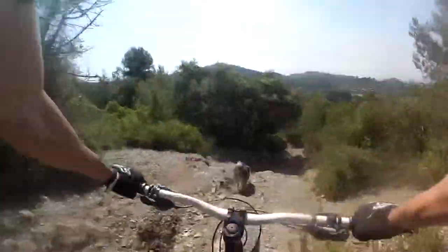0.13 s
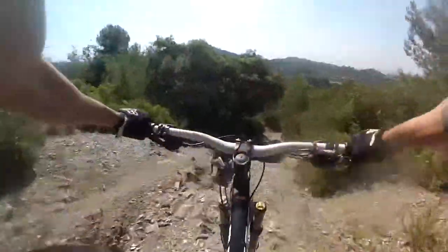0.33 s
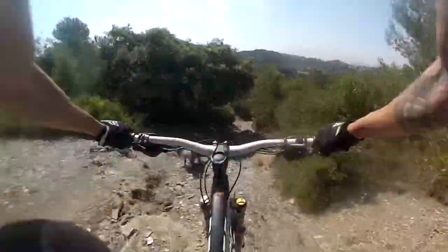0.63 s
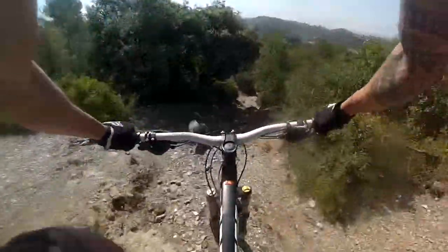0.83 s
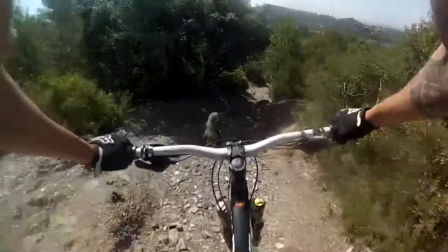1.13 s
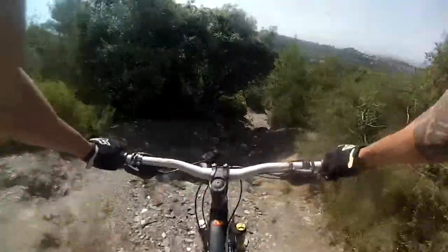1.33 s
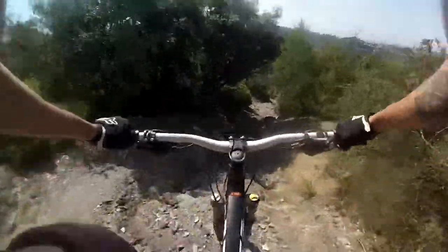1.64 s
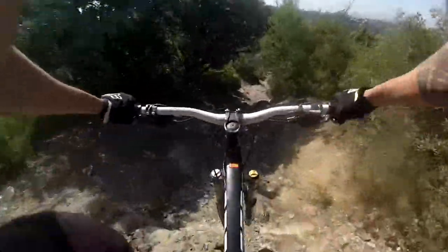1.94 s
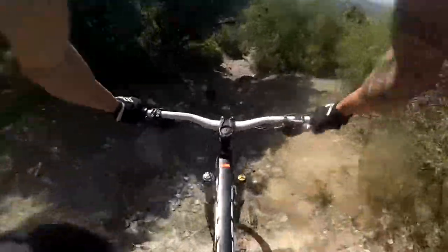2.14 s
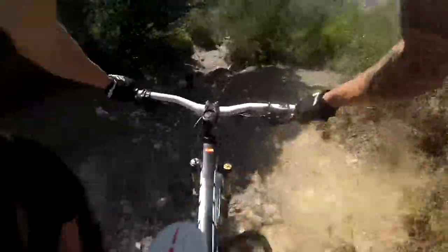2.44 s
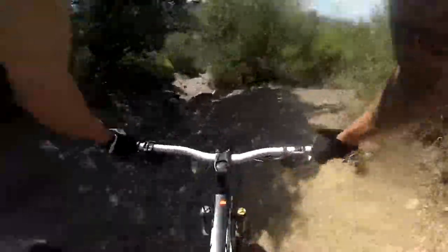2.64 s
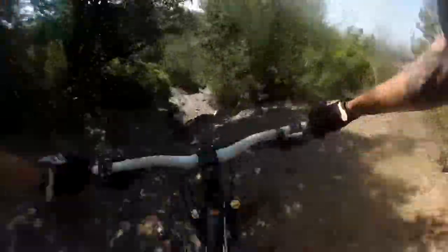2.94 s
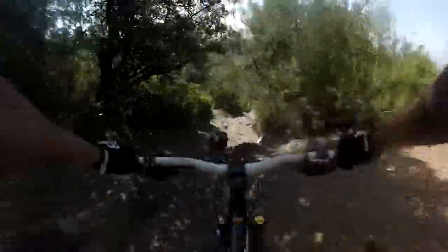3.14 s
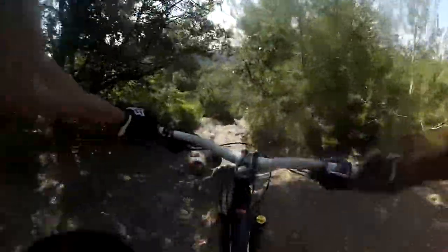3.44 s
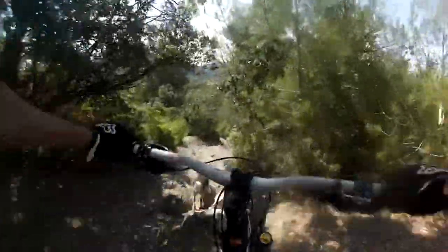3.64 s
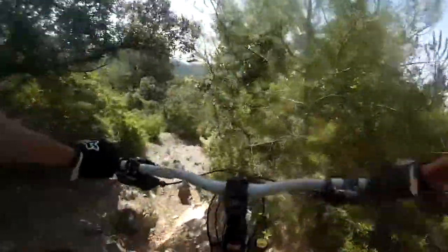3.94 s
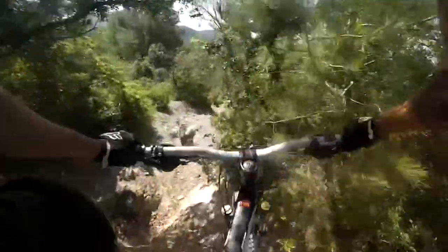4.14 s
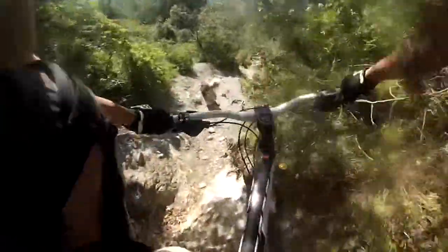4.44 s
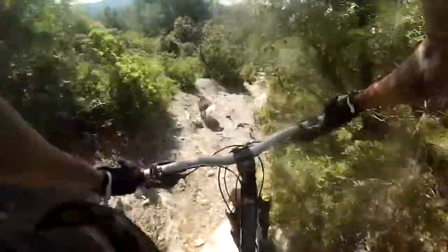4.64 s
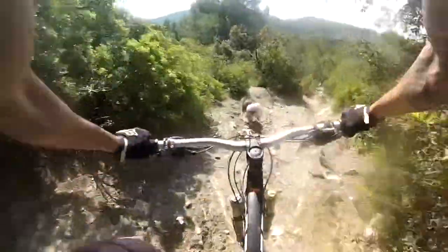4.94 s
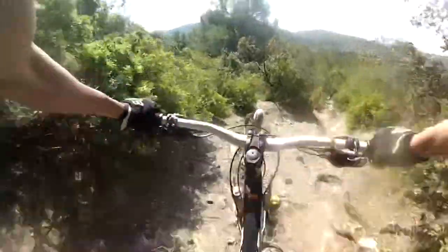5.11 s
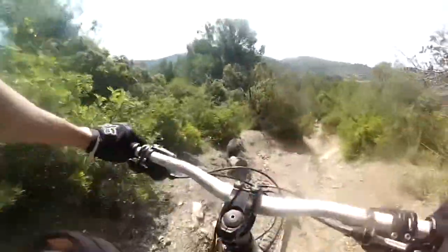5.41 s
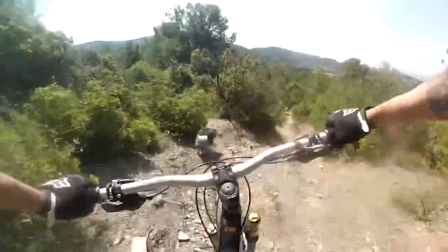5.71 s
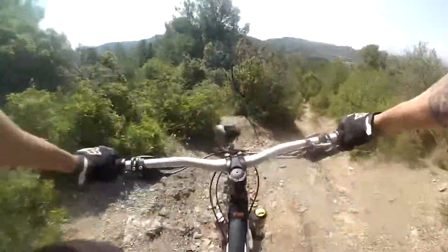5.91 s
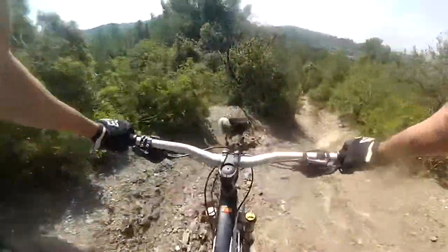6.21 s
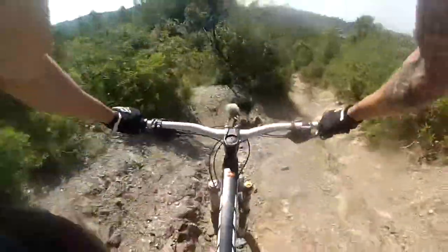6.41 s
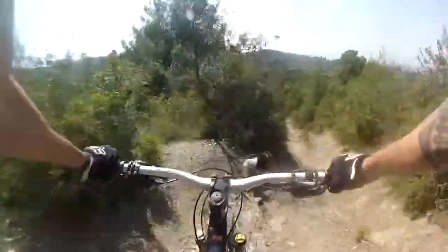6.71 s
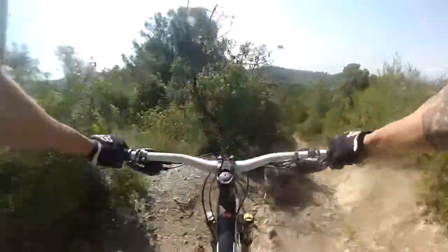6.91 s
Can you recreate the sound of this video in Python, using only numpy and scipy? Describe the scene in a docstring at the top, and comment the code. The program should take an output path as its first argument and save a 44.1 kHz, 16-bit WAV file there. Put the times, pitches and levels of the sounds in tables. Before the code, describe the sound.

A mountain bike rattles down a dry, stony trail, tyres crunching over loose stones while sharp hollow knocks hit the camera case and wind buffets.

```python
"""A mountain bike rolls 7 s down a dry, stony trail, heard from a cased camera on the rider's chest.
From 0.08 s jolts knock mount and case (short mode rings; hard ones add faint metal); the first brings a thump and
grating. Throughout, tyres thrum, grind and crunch (shaped noise and grains), stones tick, the chain jingles, gusts buffet.
At 2.96 s comes the strongest thump, at 3.1 s the strongest grating, at 3.7 s a very hard knock.
From 4.4 to 5.2 s dust hisses under sliding tyres; near 6.7 s a last thump, at 6.9 s a last bright, hard knock."""
import sys
import numpy as np
from scipy import signal
from scipy.fft import rfft, irfft, next_fast_len
from scipy.io import wavfile

SR = 44100
rng = np.random.default_rng(int(sys.argv[2]) if len(sys.argv) > 2 else 0)


def output_pcm(signal):
    """Save a mono or channel-first signal as 16-bit PCM at the path in sys.argv[1].

    Samples are clipped to [-1, 1] before scaling.
    """
    pcm = np.clip(np.atleast_2d(signal).T, -1, 1) * 32767
    wavfile.write(sys.argv[1], SR, np.round(pcm).astype(np.int16))


N = 311346
TIME_S = np.arange(N) / SR

# knocks on the case: t/s, strength/dB, hardness/dB (thud down, clack up by this), snap re strength/dB
KNOCKS = [(.0772, -20.5, 5, -6), (.1028, -38, -6, -3), (.1849, -22.5, -4.5, -9), (.2332, -18, 5.5, -4.5),
          (.281, -26.5, 4, -7), (.3965, -18, -1.5, -7.5), (.466, -33, -2.5, -10),
          (.5266, -38.5, -9.5, -3.5), (.6555, -15, -3.5, -5.5), (.68, -37, -2, -2),
          (.7099, -24, -4.5, -3.5), (.838, -31, -3, -6), (.9, -24.5, 3, -14.5), (.9315, -25, -3.5, -8.5),
          (.9954, -35, -2.5, -10), (1.071, -23, 2, -10), (1.081, -28.5, -1.5, -5.5), (1.146, -39, 3, -10),
          (1.1849, -35, 0, -10), (1.2093, -27, 4.5, 1), (1.2954, -31, 3.5, -3), (1.495, -26, 2, -5.5),
          (1.631, -42, 4, -1.5), (1.7514, -20.5, 8.5, 1), (1.8826, -48, -18.5, -25),
          (1.9897, -28, -3, -9.5), (2.1091, -35.5, -4, -10.5), (2.1459, -34.5, -3.5, -9),
          (2.2842, -19, 3.5, -9.5), (2.3803, -31.5, -1.5, -19), (2.5286, -30.5, -2, -30),
          (2.5907, -38, 4, -16), (2.6527, -22, 5, -2.5), (2.6926, -23.5, -2.5, -8.5),
          (2.7309, -22.5, 1, -8), (2.757, -23, 4.5, -14), (2.8398, -25, -0.5, -5),
          (2.8563, -31.5, -3.5, -13), (2.9808, -27.5, 2, -10), (2.9882, -38, 7, -20),
          (3.052, -27.5, 2.5, -19), (3.1015, -34, 10, -6), (3.2047, -37, 0, -11), (3.227, -40, 2, -25),
          (3.2703, -18.5, 5, -10), (3.2841, -25, 4.5, -8), (3.3108, -32.5, -2, -24), (3.3263, -34, -1, -27),
          (3.3408, -33, 1.5, -32), (3.6882, -35, -4, -5), (3.692, -15, 5, -5), (3.7175, -29.5, 9.5, 10.5),
          (3.7513, -31.5, -2, -25), (3.7559, -25.5, -1, -5), (3.993, -26, 1.5, -9.5),
          (4.1364, -24, -2.5, -6.5), (4.2794, -23, -3.5, -6), (4.3327, -39, -3, -7),
          (4.4108, -35.5, -2.5, -7.5), (4.4317, -45.5, 2, 7), (4.691, -29.5, -0.5, -12),
          (4.929, -30.5, 3, -7), (5.064, -19.5, -3, -5.5), (5.4089, -20.5, 6, -12.5),
          (5.4699, -36, -2, -7.5), (5.5394, -22.5, 8, 0.5), (5.7184, -37.5, 3.5, -16),
          (5.8038, -22, 6.5, -10), (5.9375, -26.5, -3.5, -6), (6.187, -38.5, -4, -4.5),
          (6.4805, -43.5, -3.5, -7), (6.7072, -36.5, -10, -5.5), (6.7536, -27, 0, -12),
          (6.778, -35, -5, -22), (6.7906, -42, 7, 3), (6.8311, -33, 8.5, -6), (6.931, -17, 10.5, -6.5),
          (7.0212, -34, 1.5, -17)]
# edges of the case's mode families thud, tock, clack, snap: f/Hz
FAMILY_EDGES_HZ = [510, 850, 1400, 2400, 7000]
# case modes: f/Hz, level within family/dB, t60/s; a mode above the last edge stays silent
CASE_MODES = [(631, -12, 0.097), (704, 14.5, 0.028), (783, -8, 0.11), (1023, 29, 0.017), (1113, 6, 0.045),
              (1290, -19, .01), (1494, -3.5, 0.047), (1692, 26, 0.012), (1980, 10, 0.015),
              (2680, 3.5, 0.028), (2783, 5.5, 0.017), (3172, 13, 0.007), (3327, 3, 0.02),
              (4530, -27.5, 0.042), (5060, -8, 0.022), (7060, -8, 0.033)]
# long metal ring of the bike: f/Hz, level/dB, t60/s
METAL_MODES = [(1835, -32, .3), (2013, -30.5, .27)]
# bumps through the mount as bursts of grating: t/s, level/dB, t60/s
CHAFES = [(0.093, -30, 0.19), (1.526, -36, 0.065), (2.592, -37, 0.082), (2.66, -48, 0.088),
          (2.966, -31, 0.15), (3.102, -21, 0.16), (3.293, -33.5, 0.15), (4.675, -36, 0.18),
          (5.136, -37, 0.32), (6.16, -32.5, 0.084), (6.703, -35, 0.16), (6.755, -46, 0.12)]
# grating spectrum: f/Hz, relative level/dB
CHAFE_SPECTRUM = [(400, -4), (700, 13), (1050, 16), (1400, -15), (1750, 10.5), (2200, -3), (3200, 1.5),
                  (4200, -11), (8000, -56)]
# tyre load on the ground: t/s, level/dB
LOAD = [(0, 0.5), (.7, -3.5), (1.42, -3.5), (1.62, -2), (1.86, -6), (2.25, -3), (2.7, 3), (3.15, 1.5),
        (3.55, -2), (3.84, -4), (4.15, -4), (4.5, -3.5), (4.76, 1), (5.12, -2.5), (5.4, -3), (5.82, -6.5),
        (6.15, -4.5), (6.58, -4.5), (6.85, 2), (7.06, -1)]
# rough patches of trail: start t/s, length/s, extra thrum/dB, extra stone rattle/dB
PATCHES = [(0.085, 0.063, 9, 11), (0.51, 0.048, 11, 11.5), (0.774, 0.054, 13, 11.5), (0.985, 0.029, 16, 6),
           (1.136, 0.11, 5.5, 11.5), (1.515, 0.14, 6, 14), (1.675, 0.12, 10, 16), (1.924, 0.16, 7, 6.5),
           (2.118, 0.1, 11, 5), (2.364, 0.18, 9, 8), (2.587, 0.162, 8, 12), (2.957, 0.26, 2.5, 6),
           (3.442, 0.07, 7.5, 9.5), (3.9, 0.055, 4, 14), (4.11, 0.16, 0, 7.5), (4.238, 0.12, 9.5, 7.5),
           (4.598, 0.13, 5.5, 9.5), (4.915, 0.13, 8.5, 4), (5.141, 0.125, 14, 6.5), (5.98, 0.15, 9.5, 6),
           (6.174, 0.15, 7, 1), (6.695, 0.13, 10, 10)]
# tyre thrum spectrum: f/Hz, relative level/dB
THRUM_SPECTRUM = [(60, -16.5), (120, -0.5), (210, 1.5), (310, -1.5), (430, -2), (600, -23), (1200, -55)]
# wheels drop into hollows: t/s, level/dB, pitch f/Hz, t60/s
THUMPS = [(.095, -28, 292, 0.06), (0.227, -33.5, 170, 0.059), (2.962, -20.5, 205, .09),
          (6.701, -22, 275, 0.087)]
# frame-borne rattle spectrum: f/Hz, relative level/dB
GRIND_SPECTRUM = [(300, -15), (460, 1.5), (600, 1.5), (750, 1), (1050, 4.5), (1200, -5.5), (1420, -24.5),
                  (1750, -8.5), (2200, -15.5), (2700, -17.5), (3600, -88)]
# crunching grit spectrum: f/Hz, relative level/dB
GRAVEL_SPECTRUM = [(1200, 3.5), (2200, -8.5), (3000, 3.5), (3900, -5), (4600, -3.5), (6200, -8),
                   (7500, -13), (9000, -18.5), (11700, -12), (13500, -25.5), (16000, -26)]
# single stones spat from the tyres: t/s, level/dB, band f/Hz
STONES = [(.107, -39.5, 3520), (0.565, -47, 5360), (.617, -46, 4380), (.77, -47, 4570),
          (1.344, -44.5, 4400), (1.557, -48, 4470), (1.62, -50, 3700), (2.458, -45, 3500),
          (2.569, -45.5, 5900), (2.924, -48, 4670), (2.944, -42, 5000), (2.959, -40.5, 3640),
          (3.586, -44.5, 4200), (3.717, -33, 5050), (3.874, -42.5, 4670), (4.611, -43.5, 4670),
          (4.762, -42.5, 5740), (4.905, -36, 4300), (5.386, -39, 4500), (5.671, -45.5, 3670),
          (5.839, -47.5, 5050), (6.065, -49, 5600), (6.172, -44, 2900), (6.986, -46, 4570)]
# dust hiss as the tyres slide off the rock step: t/s, level/dB
SLIDE = [(4.4, -81), (4.62, -55.5), (4.8, -51), (4.92, -63), (5.05, -58), (5.2, -100)]
# chain and rear gears jingle: t/s, level/dB
JINGLES = [(.09, -42), (.568, -40.5), (.821, -56), (2.437, -51), (2.66, -45), (2.925, -51), (2.96, -49),
           (3.808, -53), (3.858, -55), (4.357, -48), (4.432, -43.5), (4.788, -45.5), (4.863, -43.5),
           (4.906, -55), (5.787, -50), (5.84, -50), (5.912, -49), (5.987, -50), (6.065, -49),
           (6.117, -42.5), (6.275, -52), (6.32, -47.5), (6.805, -41)]
# chain and sprocket modes: f/Hz, relative level/dB, t60/s
CHAIN_MODES = [(2810, 6, 0.015), (4440, -9, 0.063), (5270, 1, 0.025), (6060, 1, 0.03), (9600, -11, 0.035),
               (11440, -3.5, 0.0067), (12500, -17, 0.018), (13200, -23, .01)]
# air flow over the case: t/s, level/dB
AIR = [(0, -55), (.9, -51), (1.45, -59.5), (1.85, -54.5), (2.2, -46.5), (2.75, -46), (3.1, -52.5),
       (3.5, -54), (4, -60), (4.45, -54.5), (4.85, -45.5), (5.2, -44.5), (5.5, -49.5), (5.85, -52.5),
       (6.15, -48), (7.06, -52.5)]
# gusts: t/s, extra level/dB
GUSTS = [(.23, 15.5), (.52, 8), (1.57, 16), (2.62, 1), (3.32, 14), (3.56, 10.5), (4.982, 7.5), (5.25, 11),
         (6.03, 12.5), (6.26, 5.5), (6.88, 7)]
# buffeting spectrum: f/Hz, relative level/dB
BUFFET_SPECTRUM = [(20, -7), (30, 4.5), (40, -7.5), (60, -1), (100, -10), (140, -10.5), (300, -71.5)]

THUD_DB, CLACK_DB = -3.5, -3.5   # re the tock, at zero hardness
TAP_DB, TAP_SPREAD_DB, TAP_SNAP_DB = -47, -2, -1   # random taps: level at zero load, spread, snap re tap
THRUM_DB, GRIND_DB, GRAVEL_DB = -52, -49, -52.5   # at zero load, off the patches
GRAVEL_PER_LOAD, GRAVEL_PER_RATTLE = 0.87, 0.36   # dB of crunch per dB
PATCH_EDGE_S = 0.027   # ramp on and off a patch
PEBBLE_DB, PEBBLE_HZ = -53.5, 4650   # random small stones, before their spread
GUST_S = 0.074   # half width at 1/e of the dB rise
CUTOFF_HZ = 15400


def knocks(roughness, rough_t60_s, edge_db):
    """Each knock drives four mode families separately; higher ones feel more of the contact's grit."""
    out = np.zeros(N)
    for t_s, *blow in KNOCKS + taps():
        levels_db = family_levels(*blow)
        families = zip(levels_db, FAMILY_EDGES_HZ, FAMILY_EDGES_HZ[1:])
        for k, (level_db, low_hz, high_hz) in enumerate(families):
            force = contact(roughness * np.sqrt(low_hz / 1000), rough_t60_s, bounce=.3)
            family = np.zeros(len(force))
            for hz, db, t60_s in CASE_MODES:
                if low_hz <= hz < high_hz:
                    # the load on the mount shifts the modes from blow to blow
                    gain = from_db(db + rng.normal(0, 3))
                    family += gain * ring(force, hz * rng.normal(1, .04), t60_s)
            family = blow_one(band(family, .88 * low_hz, 1.05 * high_hz, order=4))
            build_up_s = .2 / (high_hz - low_hz)   # narrow families swell longer
            add(out, t_s - build_up_s, (-1) ** k * from_db(level_db) * family)
        # thin bright edge of the contact itself, level re snap
        edge = band(contact(roughness, rough_t60_s, bounce=.3), 9000, 13000)
        add(out, t_s, from_db(levels_db[-1] + edge_db) * blow_one(edge))
    return signal.lfilter(*signal.iirnotch(4080, 12, SR), out)   # case is stiff and mute near 4 kHz


def taps():
    """Light knocks at random, stronger when the tyres work harder."""
    return [(t_s, TAP_DB + curve(LOAD, t_s) + TAP_SPREAD_DB * a, TAP_SPREAD_DB * b, TAP_SNAP_DB)
            for t_s, a, b in scattered(count=15)]


def family_levels(db, hardness_db, snap_db):
    """Thud, tock, clack and snap levels; a harder contact trades thud for clack."""
    return db + THUD_DB - hardness_db, db, db + CLACK_DB + hardness_db, db + snap_db


def contact(roughness, rough_t60_s, bounce, size=2600):
    """Force of one hard touch: a click, a few ms of crunching rough faces, one bounce."""
    sparse = rng.random(size) < .1
    grit = rng.standard_normal(size) * sparse * from_db(-60 * TIME_S[:size] / rough_t60_s)
    force = roughness * grit / np.sqrt(np.sum(grit ** 2) + 1e-12)
    force[0] += 1
    again = np.zeros(size)
    add(again, rng.uniform(.003, .008), rng.uniform(-1, 1) * bounce * force)
    return force + again


def metal():
    """Clacks set the bike's metal parts singing faintly; soft clacks hardly excite them."""
    clicks = np.zeros(N)
    for t_s, *blow in KNOCKS:
        _, _, clack_db, _ = family_levels(*blow)
        click_db = clack_db + min(0, clack_db + 20)   # double slope below -20 dB
        add(clicks, t_s, from_db([click_db]))
    return sum(from_db(db) * ring(clicks, hz, t60_s) for hz, db, t60_s in METAL_MODES)


def chafes():
    """Runs of tiny slips in the mount sound through the case."""
    pressure = sum(from_db(db) * fade(t_s, t60_s, rise_s=0.0016) for t_s, db, t60_s in CHAFES)
    slips = grains(500, spread_db=3.0)
    return pressure * colour(slips, CHAFE_SPECTRUM)


def thrum(load_db, bumps_db):
    """Tyres hum as lumpy low noise, louder under load and on patches."""
    return from_db(THRUM_DB + load_db + bumps_db) * lumpy(THRUM_SPECTRUM, lump_db=3.0, rate_hz=75)


def thumps():
    """Tyre and suspension take a dull, soft blow: fading low noise."""
    out = np.zeros(N)
    for t_s, db, hz, t60_s in THUMPS:
        body = rms_one(band(rng.standard_normal(N), .55 * hz, 1.9 * hz))
        out += from_db(db) * fade(t_s, t60_s, rise_s=.004) * body
    return out


def grinding(level_db, clump_db):
    """Small stones shake the frame; the shaking reaches the case as a dense, grainy rattle."""
    jolts = grains(800, spread_db=2.8)
    return from_db(level_db) * colour(jolts * from_db(clump_db * drift(31)), GRIND_SPECTRUM)


def rough_patches():
    """Extra thrum and stone rattle in dB while the tyres cross each patch."""
    thrum_db, rattle_db = 0, 0
    for start_s, length_s, bump_db, stones_db in PATCHES:
        inside_s = np.minimum(TIME_S - start_s, start_s + length_s - TIME_S)
        on = np.clip(.5 + inside_s / PATCH_EDGE_S, 0, 1)
        thrum_db = thrum_db + bump_db * on
        rattle_db = rattle_db + stones_db * on
    return thrum_db, rattle_db


def gravel(level_db, per_s, spread_db, clump_db):
    """Grit breaks under the tread in clumps, denser when louder; coarse and fine grit also clump apart."""
    rate = per_s * from_db(0.85 * (level_db - np.mean(level_db)))
    edges_hz = [1200, 2400, 3600, 5000, 7000, 9500, 16500]
    grit = np.zeros(N)
    for low_hz, high_hz in zip(edges_hz, edges_hz[1:]):
        grit += band(grains(rate, spread_db), low_hz, high_hz) * from_db(4.4 * drift(46))
    clumped = from_db(clump_db * drift(67)) * grit / np.sqrt(rate)   # density alone adds no level
    return from_db(level_db) * colour(clumped, GRAVEL_SPECTRUM)


def stones(t60_s, size=2600):
    """A stone cracks against others: a short, dry burst of banded grit."""
    out = np.zeros(N)
    pebbles = [(t_s, PEBBLE_DB + 2 * a, PEBBLE_HZ * np.exp(0.18 * b)) for t_s, a, b in scattered(count=24)]
    for t_s, db, hz in STONES + pebbles:
        grit = rng.standard_normal(size) * from_db(-60 * TIME_S[:size] / t60_s)
        crack = band(band(grit, .5 * hz, 1.07 * hz, order=1), 1000, 12000)
        add(out, t_s, from_db(db) * blow_one(crack))
    return out


def slide():
    """Fine dust slides under the tyres: a smooth, bright noise band."""
    level_db = np.interp(TIME_S, *np.transpose(SLIDE), left=-120, right=-120)
    hiss = rms_one(band(rng.standard_normal(N), 3800, 9600))
    return from_db(level_db + 2 * drift(30)) * hiss


def chain(gravel_db, t60_s, loose_db, size=2600):
    """Links scrape over sprockets in bursts, each favouring other modes; random touches follow the crunch."""
    loose = [(t_s, np.interp(t_s, TIME_S, gravel_db) + loose_db + rng.normal(0, 0.99))
             for t_s in rng.uniform(0, N / SR, size=90)]
    out = np.zeros(N)
    for t_s, level_db in list(JINGLES) + loose:
        scrape = rng.standard_normal(size) * from_db(-60 * TIME_S[:size] / t60_s)
        luck_db = rng.normal(0, 5, len(CHAIN_MODES))
        modes = np.zeros(size)
        for k, (hz, db, mode_t60_s) in enumerate(CHAIN_MODES):
            modes += (-1) ** k * from_db(db + luck_db[k]) * ring(scrape, hz, mode_t60_s)
        rasp = blow_one(band(scrape, 4000, 12500))
        add(out, t_s, from_db(level_db) * blow_one(blow_one(modes) + .6 * rasp))
    return out


def wind():
    """Air flow and short gusts buffet the case: lumpy, very low noise."""
    level_db = curve(AIR, TIME_S)
    for t_s, db in GUSTS:
        level_db = level_db + db * np.exp(-((TIME_S - t_s) / GUST_S) ** 2)
    return from_db(level_db) * lumpy(BUFFET_SPECTRUM, lump_db=-1.0, rate_hz=12.5)


def ring(force, hz, t60_s):
    """One resonant mode: a unit click starts a swing of height about 1."""
    radius = from_db(-60 / (t60_s * SR))
    angle = 2 * np.pi * min(hz, .45 * SR) / SR
    return signal.lfilter([.5, 0, -.5], [1, -2 * radius * np.cos(angle), radius ** 2], force + 1e-18)


def grains(per_s, spread_db):
    """Random clicks of either sign, many small and a few large."""
    sizes = from_db(spread_db * np.minimum(rng.exponential(1, N), 4))
    return sizes * rng.choice([-1, 1], N) * (rng.random(N) < per_s / SR)


def lumpy(spectrum, lump_db, rate_hz):
    """Coloured noise of rms 1 whose strength wanders."""
    return colour(rng.standard_normal(N) * from_db(lump_db * drift(rate_hz)), spectrum)


def drift(rate_hz):
    """Slow random curve of rms 1: noise through two equal poles at rate_hz, run at SR / 40."""
    pole = np.exp(-80 * np.pi * rate_hz / SR)
    noise = rng.standard_normal(N // 40 + 2002)
    slow = signal.lfilter([1], [1, -2 * pole, pole ** 2], noise)[2000:]   # drop the settling
    return np.interp(np.arange(N) / 40, np.arange(len(slow)), rms_one(slow))


def fade(t_s, t60_s, rise_s):
    """Envelope: quick swell at t_s, then exponential decay."""
    age_s = np.maximum(TIME_S - t_s, 0)
    return (1 - np.exp(-age_s / rise_s)) * from_db(-60 * np.minimum(age_s / t60_s, 4))


def scattered(count):
    """One random moment per equal time slot, with two uniform chance values of rms 1."""
    slot, a, b = rng.random((count, 3)).T
    t_s = (np.arange(count) + slot) * N / SR / count
    return zip(t_s, (a - .5) * np.sqrt(12), (b - .5) * np.sqrt(12))


def curve(points, t_s):
    """Read a control curve at t_s by linear interpolation."""
    return np.interp(t_s, *np.transpose(points))


def colour(x, spectrum):
    """Causal minimum-phase filter with the given spectrum, via the folded cepstrum; rms 1."""
    hz, db = np.transpose(spectrum)
    size = next_fast_len(N + SR // 10, real=True) // 2 * 2
    grid_hz = np.maximum(np.arange(size // 2 + 1) * SR / size, 1)
    gain = from_db(np.interp(np.log(grid_hz), np.log(hz), db))
    cepstrum = irfft(np.log(gain))
    cepstrum[1:size // 2] *= 2
    cepstrum[size // 2 + 1:] = 0
    response = np.exp(rfft(cepstrum))
    return rms_one(irfft(rfft(x, size) * response)[:N])


def band(x, low_hz, high_hz, order=2):
    """Butterworth band-pass."""
    edges_hz = [low_hz, min(high_hz, .45 * SR)]
    return signal.sosfilt(signal.butter(order, edges_hz, "band", fs=SR, output="sos"), x)


def add(out, t_s, sound):
    """Mix a sound in at t_s."""
    i = int(np.clip(round(t_s * SR), 0, len(out) - 1))
    out[i:i + len(sound)] += sound[:len(out) - i]


def blow_one(x):
    """Scale a short sound to the energy of 10 ms at rms 1."""
    return x / np.sqrt(np.sum(x ** 2) / (.01 * SR) + 1e-20)


def rms_one(x):
    """Scale to rms 1."""
    return x / np.sqrt(np.mean(x ** 2) + 1e-20)


def from_db(db):
    """dB to amplitude."""
    return 10 ** (np.asarray(db) / 20)


def scene():
    """Load and patches drive thrum, grinding and crunch; one close microphone feeds both channels."""
    load_db = curve(LOAD, TIME_S)
    bumps_db, rattle_db = rough_patches()
    gravel_db = GRAVEL_DB + GRAVEL_PER_LOAD * load_db + GRAVEL_PER_RATTLE * rattle_db
    case = knocks(roughness=1.0, rough_t60_s=0.0088, edge_db=-31) + chafes()
    tyres = thrum(load_db, bumps_db) + thumps()
    frame = grinding(GRIND_DB + load_db + rattle_db, clump_db=4.5)
    ground = gravel(gravel_db, per_s=4600, spread_db=2.5, clump_db=2.5) + stones(t60_s=0.035) + slide()
    bike = metal() + chain(gravel_db, t60_s=0.029, loose_db=-1.0)
    return np.tile(case + tyres + frame + ground + bike + wind(), (2, 1))


def record(dry):
    """The hardest knocks overload the microphone (soft clip at 1); the top is cut at CUTOFF_HZ."""
    clipped = dry / (1 + dry ** 8) ** (1 / 8)
    return signal.sosfilt(signal.ellip(10, .1, 80, CUTOFF_HZ, fs=SR, output="sos"), clipped)


dry = scene()
out = record(dry)
output_pcm(out)
```